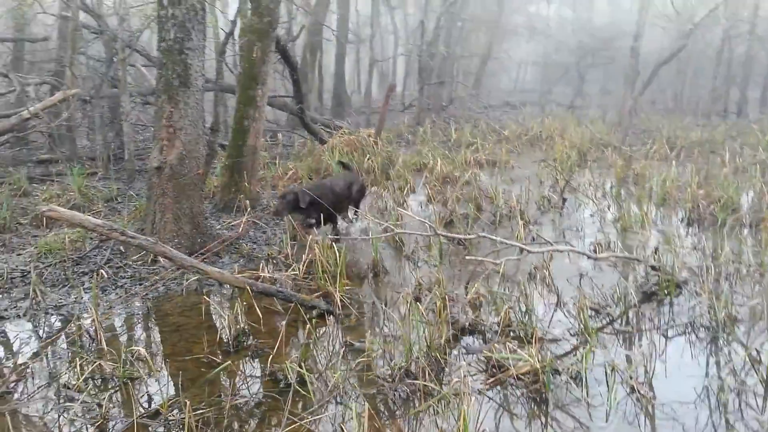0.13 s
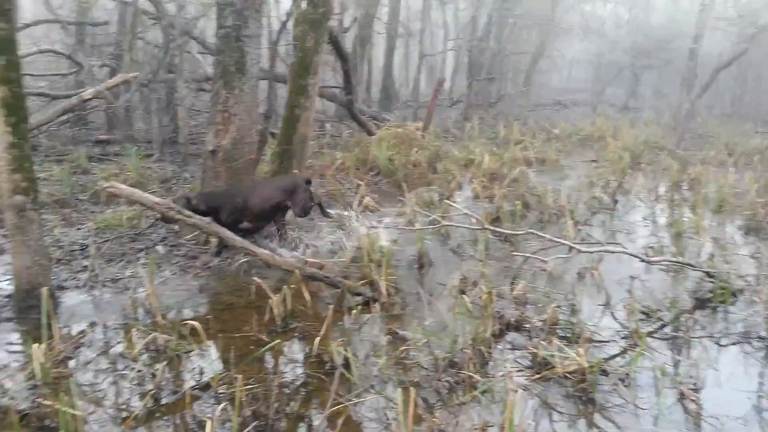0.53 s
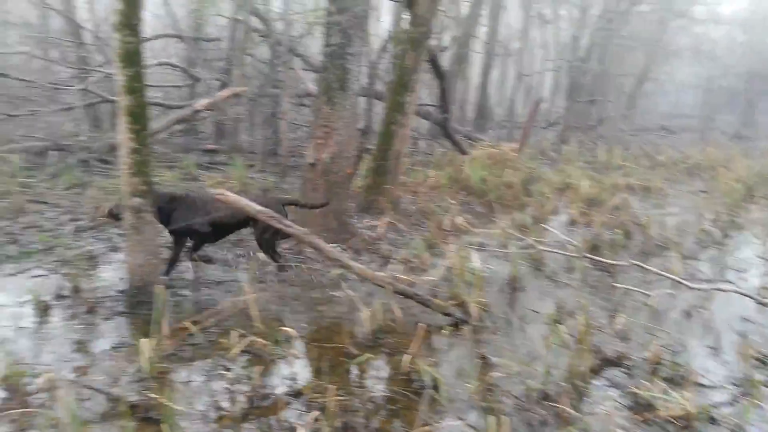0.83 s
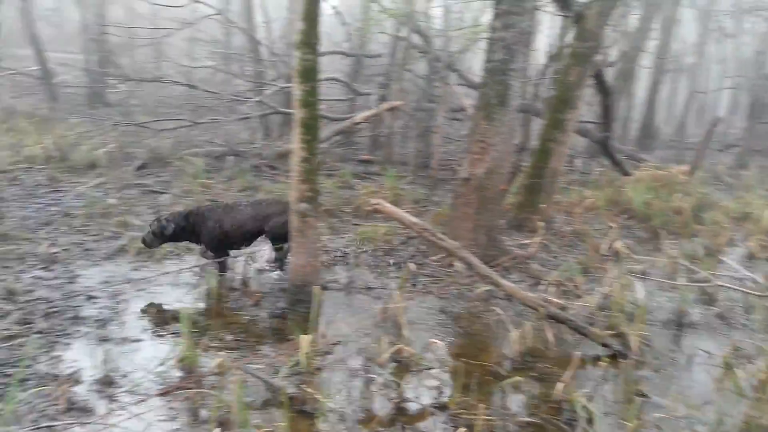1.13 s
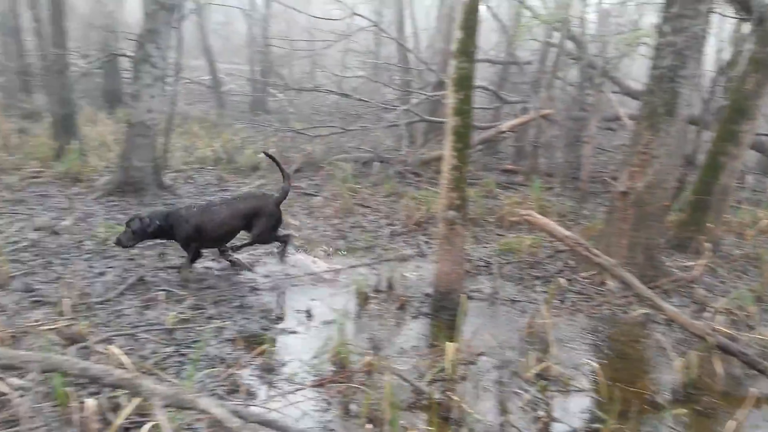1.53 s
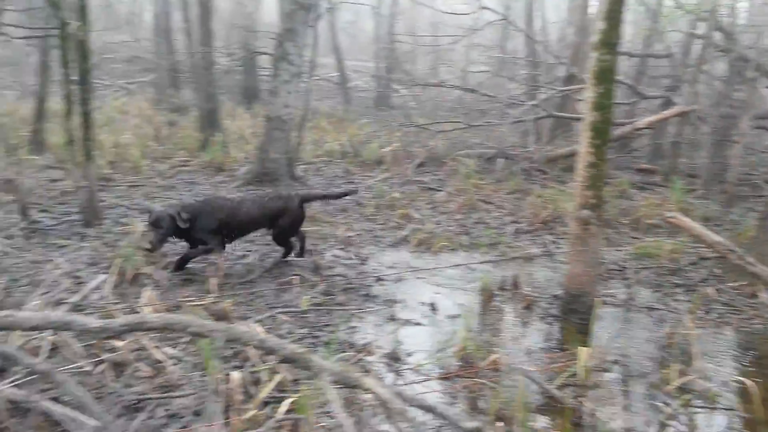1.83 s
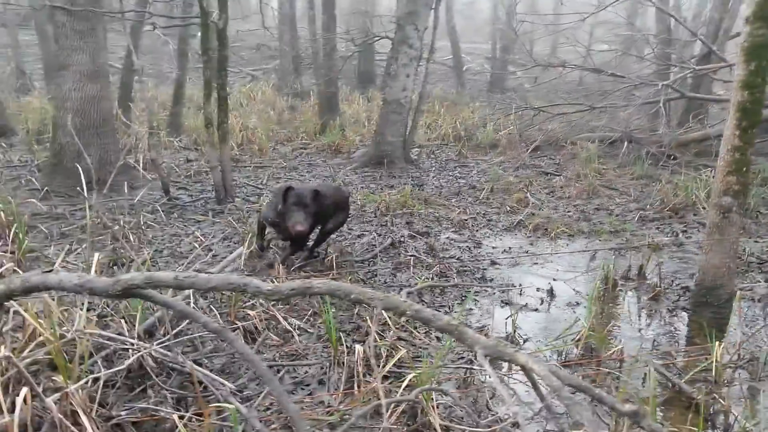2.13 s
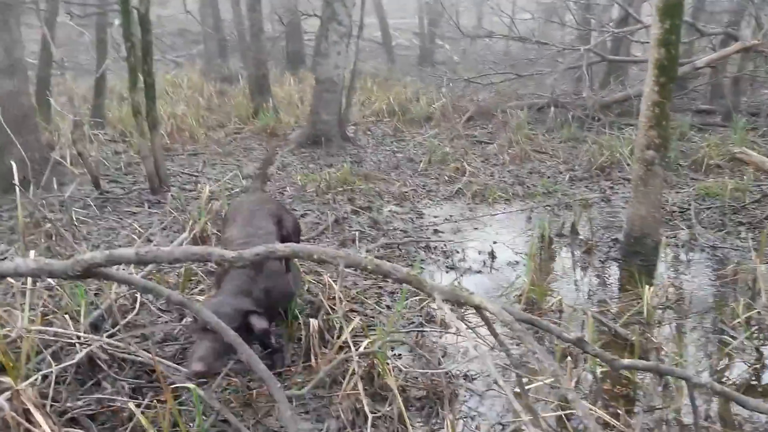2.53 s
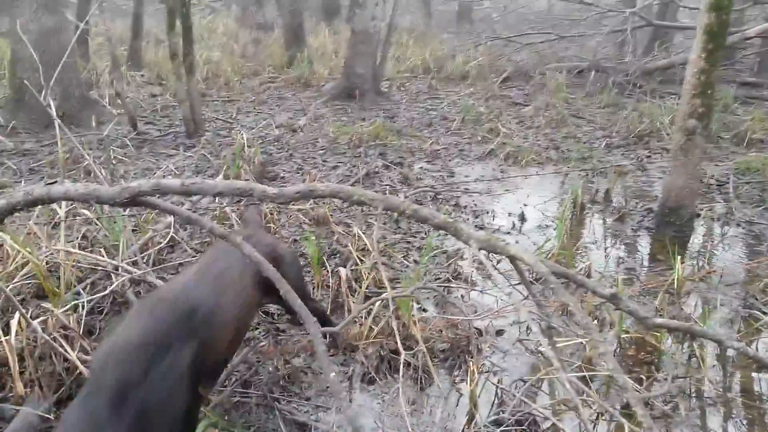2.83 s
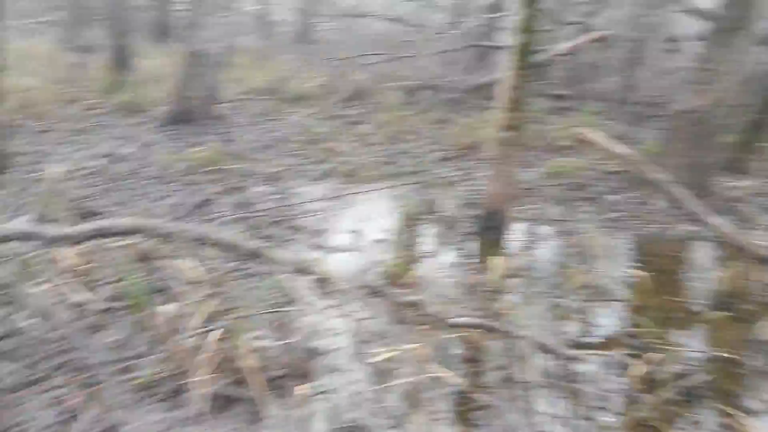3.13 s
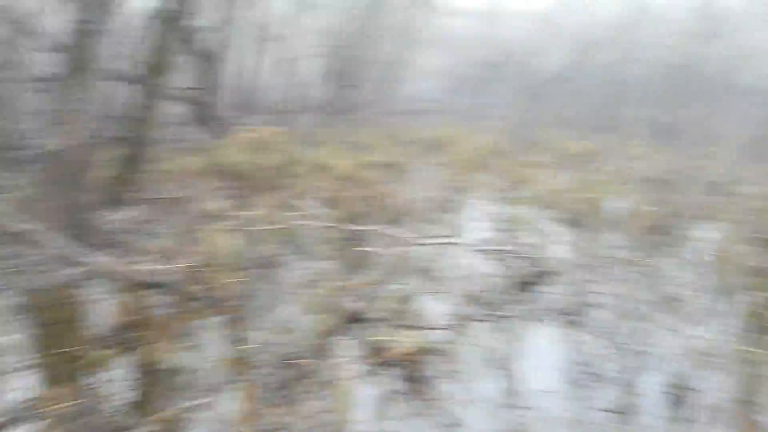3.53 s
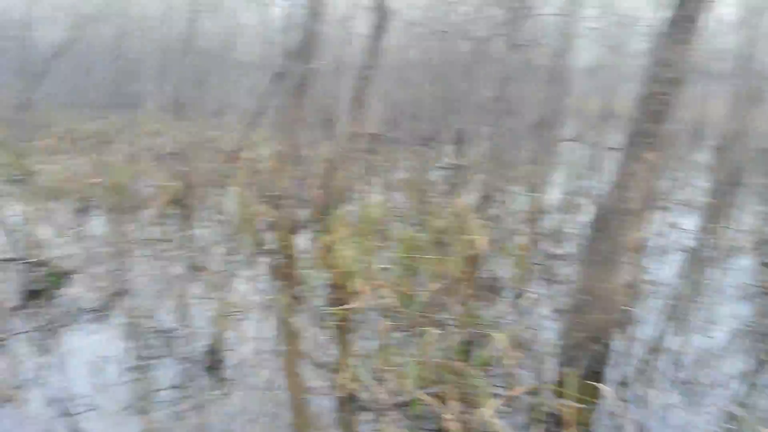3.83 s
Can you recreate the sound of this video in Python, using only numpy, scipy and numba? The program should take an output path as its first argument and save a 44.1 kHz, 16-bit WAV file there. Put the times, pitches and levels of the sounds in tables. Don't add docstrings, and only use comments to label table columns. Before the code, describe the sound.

A dog's paws splash through shallow water and wet stems in woodland, trotting across with crisp slaps, easing briefly, then galloping close past a hand-held phone, with slopping gurgles and duller treble at the end.

```python
import sys
import numpy as np
from scipy import signal
from scipy.fft import rfft, irfft
from scipy.io import wavfile
from scipy.ndimage import uniform_filter1d, map_coordinates
from numba import njit

SR = 44100
rng = np.random.default_rng(int(sys.argv[2]) if len(sys.argv) > 2 else 0)


def file_out(sig):
    cols = np.atleast_2d(sig).T
    lim = np.clip(cols, -1, 1)
    pcm = np.round(lim * 32767).astype(np.int16)
    wavfile.write(sys.argv[1], SR, pcm)


def gain_from_db(level_db):
    decades = np.asarray(level_db, float) / 20
    return 10 ** decades


N = 176400

# start_s, slap_db, spray_under_slap_db, spray_decay_s,
# body_under_slap_db
PAW_SLAPS = [(0.0531, -7, -36, 0.04, -26), (0.134, -31.5, -12, 0.034, -2.5),
             (0.142, -15.5, -11, 0.016, -13), (0.2901, -11.5, -12.5, 0.046, -15.5),
             (0.4005, -9.5, -15, 0.037, -28), (0.5517, -29, -28.5, 0.018, -13), (0.585, -25, -5, 0.12, -42),
             (0.631, -10, -10.5, 0.025, -28.5), (0.855, -25.5, 1, 0.034, -40),
             (0.891, -15, -6.5, 0.035, -51), (1.082, -17, -40, 0.0099, -18.5),
             (1.1159, -8, -19.5, 0.07, -35), (1.253, -23.5, -42, 0.22, -24), (1.3477, -16.5, -6, 0.04, -17),
             (1.399, -17, -18, 0.043, -17.5), (1.555, -19.5, -18, 0.031, -11.5),
             (1.573, -16.5, -11, 0.014, -11.5), (1.585, -13.5, -13, 0.033, -35),
             (1.604, -15, -18, 0.037, -31), (1.64, -14, -31, 0.0065, -14), (1.7125, -24.5, -6, 0.1, -23),
             (1.9628, -22, -33, 0.08, -23),
             (2.29, -34.5, -2, 0.048, -55), (2.375, -25, -17, 0.05, -40),
               (2.388, -25.5, -2, 0.051, -20.5), (2.4542, -25, -13, 0.033, -48),
               (2.477, -17.5, -42, 0.07, -29), (2.528, -22, 4, 0.02, -9.5), (2.587, -27.5, -23, 0.022, -14),
               (2.6626, -25, -0.5, 0.047, -21), (2.741, -36, -23, 0.057, -43),
               (2.7557, -11, -13.5, 0.067, -53), (2.8106, -18, -4, 0.035, -20), (2.836, -14, -3, 0.02, -36),
               (2.893, -2.5, -15, 0.061, -32), (3.0344, -20.5, -6, 0.14, -15),
               (3.074, -10.5, -3, 0.054, -19), (3.132, -11.5, -22, 0.014, -18.5),
               (3.142, -23.5, 6, 0.057, -4), (3.235, -29, 8, 0.043, -36), (3.2786, -10, -5.5, 0.059, -48.5),
               (3.295, -18, 1, 0.09, -11), (3.46, -22.5, 2.5, 0.071, -4.5),
               (3.4864, -13.5, -14.5, 0.078, -12.5), (3.571, -27.5, -16, 0.02, -2.5),
               (3.6695, -28, -15, 0.032, -0.5), (3.735, -38.5, -18, 0.062, 5),
               (3.8135, -30.5, 7, 0.18, -7.5), (3.871, -15.5, -7.5, 0.017, -33)]
# start_s, level_db, pitch_hz
AIR_POCKETS = [(0.054, -19, 532), (0.14, -17.5, 740), (0.291, -14, 940), (0.401, -20, 2400),
               (0.451, -35, 1060), (0.562, -28.5, 834), (0.63, -35, 293), (1.081, -22, 1900),
               (1.1, -21, 2500), (1.151, -20.5, 1510), (1.352, -47, 910), (1.405, -32, 535),
               (1.471, -25.5, 1500), (1.568, -19, 1470), (1.608, -22, 1540), (1.642, -19, 1040),
               (1.734, -27.5, 1070), (2.019, -40, 284), (2.529, -20, 1750), (2.814, -31.5, 320),
               (2.894, -12.5, 527), (2.92, -12, 1910), (3.075, -11.5, 1110), (3.165, -22, 447),
               (3.19, -23, 370), (3.247, -29, 324), (3.306, -9, 653), (3.353, -16.5, 440),
               (3.473, -18.5, 477), (3.849, -19, 436)]
# start_s, level_db, pitch_hz, length_s
HOLE_GLUGS = [
    (0.529, -41, 914, 0.024),
    (3.346, -27, 258, 0.022),
    (3.377, -30, 555, 0.027),
    (3.591, -36.5, 331, 0.04),
    (3.673, -30.5, 320, 0.015),
    (3.801, -31, 306, 0.032),
    (3.828, -34, 400, 0.02),
    (3.919, -35, 341, 0.034),
    (3.939, -35, 303, 0.029),
    (3.945, -34, 574, 0.012),
]
# time_s, patter_db
WADING = [(0, -36.5), (.94, -39), (.98, -46.5), (1.07, -45.5), (1.2, -40.5), (1.8, -43), (1.9, -46),
          (2.03, -44), (2.09, -52.5), (2.2, -40), (2.3, -60), (2.6, -38.5), (2.65, -51), (2.72, -36),
          (3.6, -39.5), (4, -36)]
# time_s, churn_db
HOLE_CHURN = [(0, -52.5), (2.7, -48), (3.15, -45.5), (3.33, -33.5), (3.39, -25.5), (3.43, -35), (3.47, -23),
              (3.56, -37), (3.66, -32.5), (3.68, -35), (3.71, -35.5), (3.79, -33.5), (3.81, -25.5),
              (3.88, -31.5), (3.95, -28), (4, -47)]
# start_s, level_db, top_octave_under_whole_db
STEM_TICKS = [(0.0454, -15, -13), (0.0654, -16, -21), (0.2887, -15, -8), (0.3034, -15, -19),
              (0.3274, -21, -13), (0.4005, -12, -10), (0.4164, -20, -8), (0.5536, -18, -11), (0.6, -17, -7),
              (0.6354, -11, -16), (0.8929, -16, -11), (1.1174, -10, -12), (1.1824, -24, -11),
              (1.2017, -28, -13), (1.2424, -27, -7), (1.2545, -22, -10), (1.3299, -22, -5),
              (1.3503, -17, -8), (1.4012, -15, -12), (1.7345, -24, -10), (1.8138, -22, -23),
              (2.0028, -31, -10), (2.0183, -29, -9), (2.0264, -25, -13), (2.2947, -23, -11),
              (2.3875, -23, -11), (2.3999, -24, -8), (2.4114, -20, -12), (2.4214, -24, -16),
              (2.4304, -30, -10), (2.4553, -25, -11), (2.4678, -20, -10), (2.4788, -15, -15),
              (2.587, -25, -16), (2.6653, -24, -11), (2.6793, -23, -11), (2.7104, -19, -15),
              (2.7364, -24, -13), (2.7427, -15, -10), (2.7541, -12, -12), (2.7704, -19, -8),
              (2.8095, -15, -11), (2.8933, -8, -12), (3.0804, -12, -10), (3.0964, -9, -12),
              (3.1094, -11, -11), (3.1318, -11, -10), (3.2789, -11, -16), (3.2974, -15, -11),
              (3.473, -19, -15), (3.4875, -15, -17), (3.5504, -23, -17), (3.8526, -24, -18),
              (3.8726, -19, -22), (3.9764, -23, -11)]
# time_s, left_port_lag_samples
DOG_BEARING = [
    (0, 1.7),
    (1.3, 5),
    (2.4, 1.55),
    (3.1, 8.8),
]
# frequency_hz, density_db_per_hz
SPRAY_SPECTRUM = [(1200, -8.5), (2200, -2), (5500, -3), (11000, -4.5), (16000, -5.5)]
# frequency_hz, density_db_per_hz
BODY_SPECTRUM = [(250, -30), (500, -3.5), (1000, -0.5), (2000, -3.5), (5000, -19)]
# frequency_hz, density_db_per_hz
RUMBLE_SPECTRUM = [(25, -32), (65, 4), (160, -1), (300, -8.5), (700, -32), (2000, -22.5)]
# frequency_hz, density_db_per_hz
DRIZZLE_SPECTRUM = [(2500, -20), (6000, -1), (13000, -6)]
# frequency_hz, width_hz, level_db
LEFT_RESONANCES = [(5110, 890, 13), (18700, 1240, 19.5)]
# frequency_hz, width_hz, level_db
RIGHT_RESONANCES = [(12190, 1360, 13), (420, 2400, -7)]


def colour(points):
    f = np.arange(N // 2 + 1) * SR / N + 1
    hz, db = np.array(points, float).T
    a, b = rfft(rng.standard_normal((2, N)))
    alike = 0.87 / (1 + (f / 2400) ** 2)
    pair = np.array([a, alike * a + np.sqrt(1 - alike ** 2) * b])
    x = irfft(gain_from_db(np.interp(np.log(f), np.log(hz), db)) * pair, N)
    return x / x.std()


def walk(rate_hz):
    k = int(SR / rate_hz)
    w = uniform_filter1d(uniform_filter1d(rng.standard_normal(N), k), k)
    return w / w.std()


def follow(points):
    return np.interp(np.arange(N) / SR, *np.array(points).T)


def late(x):
    left = map_coordinates(x[0], [np.arange(N) - follow(DOG_BEARING)], mode="mirror")
    return np.array([left, x[1]])


def patchy(x, depth_db, rate_hz):
    spec, f = rfft(x), np.arange(N // 2 + 1) * SR / N
    edges = [0, 1800, 2800, 4200, 6500, 9500, SR]
    out = np.zeros((2, N))
    for lo, hi in zip(edges, edges[1:]):
        out += irfft(spec * ((f >= lo) & (f < hi)), N) * gain_from_db(depth_db * walk(rate_hz))
    return out


@njit
def ring(n, at, w, cycles, size, lag, glide, onset):
    out = np.zeros((2, n))
    for g in range(len(at)):
        fade = 6.9 * w[g] / (2 * np.pi * cycles[g])
        for c in range(2):
            start = at[g] + (lag[g] if c == 0 else 0.)
            i0 = int(start) + 1
            for i in range(max(i0, 0), min(n, i0 + int(5 / fade))):
                u = i - start
                level = size[g] * np.exp(-fade * u) * (1 - np.exp(-onset * w[g] * u))
                out[c, i] += level * np.sin(w[g] * u * (1 + glide * fade * u))
    return out


def grains(s, hz, cycles, size, glide):
    scatter = 3 * rng.standard_normal(len(s))
    lag = np.interp(s, *np.array(DOG_BEARING).T) + scatter
    return ring(N, s * SR, 2 * np.pi * hz / SR, cycles * np.ones(len(s)), size, lag, 1. * glide, 0.28)


def shower(env, count, lo_hz, hi_hz, cycles, glide):
    when, pitch, rarity, sign = rng.random((count, 4)).T
    hz = lo_hz * (hi_hz / lo_hz) ** pitch
    size_db = 2.0 * np.minimum(-np.log(1 - rarity), 4.0)
    size = gain_from_db(size_db) * np.sign(sign - .5) / np.sqrt(np.mean(gain_from_db(2 * size_db)))
    gain = np.sqrt(4 * 4.74 * N / count / cycles * hz / SR)
    return grains(when * N / SR, hz, cycles, size * gain * env[(when * N).astype(int)], glide)


def rumble():
    hum_hz = 151.4 + 4 * walk(8)
    hum = gain_from_db(-56.5 + 3 * walk(7)) * np.sin(2 * np.pi * np.cumsum(hum_hz) / SR)
    return colour(RUMBLE_SPECTRUM) * gain_from_db(-49.5 + 1.5 * walk(6)) + hum


def drizzle():
    return colour(DRIZZLE_SPECTRUM) * gain_from_db(-58 + 2.7 * walk(30))


def paw_efforts():
    rise_s, slap_s = 0.0018, 0.0032
    t, power = np.arange(N) / SR, np.zeros((3, N))
    for s, db, spray_db, decay_s, body_db in PAW_SLAPS:
        i = int(s * SR)
        u = t[i:i + SR // 2] - s + 1 / SR
        rise = 1 - np.exp(-u / rise_s)
        tail = (1 - np.exp(-u / (0.19 * decay_s))) * np.exp(-(u / decay_s) ** 1.35)
        slap = rise * np.exp(-u / slap_s)
        spray = gain_from_db(spray_db) * rise * tail
        body = gain_from_db(body_db + 9) * (slap + 0.64 * tail)
        power[:, i:i + len(u)] += gain_from_db(2 * db) * np.array([slap, spray, body]) ** 2
    return np.sqrt(power)


def crackle(env, count):
    when, rarity = rng.random((count, 2)).T
    hit = np.zeros(N)
    hit[(when * N).astype(int)] = gain_from_db(np.minimum(-4.5 * np.log(1 - rarity), 9))
    click_s = 0.00031
    return env * signal.lfilter([1], [1, -np.exp(-1 / (click_s * SR))], hit)


def spray_sheet(slap, wet):
    torn = wet * gain_from_db(3.42 * walk(93)) + 0.69 * crackle(wet, count=260)
    noise = patchy(colour(SPRAY_SPECTRUM), depth_db=2.5, rate_hz=37.4)
    return late(noise * gain_from_db(-11) * np.hypot(gain_from_db(3.5) * slap, torn))


def splash_body(body):
    return late(colour(BODY_SPECTRUM) * body * gain_from_db(-8.0 + 1.55 * walk(190)))


def splashes():
    slap, spray, body = paw_efforts()
    patter, churn = gain_from_db(follow(WADING)), gain_from_db(follow(HOLE_CHURN))
    wet = np.hypot(spray, patter * gain_from_db(3.5 + 0.97 * walk(10.5)))
    stirred = np.hypot(body, 1.52 * patter)
    drops = shower(wet, count=6000, lo_hz=1520, hi_hz=13900, cycles=4.8, glide=0.018)
    bubbles = shower(stirred, count=1500, lo_hz=685, hi_hz=3120, cycles=24, glide=0.059)
    gurgle = shower(churn, count=2000, lo_hz=245.7, hi_hz=775, cycles=5.5, glide=0.0092)
    water = spray_sheet(slap, wet) + splash_body(body)
    return water + gain_from_db(-7.5) * drops + gain_from_db(-13) * bubbles + gain_from_db(-3) * gurgle


def ticks():
    s, db, top_db = np.repeat(np.array(STEM_TICKS), 6, axis=0).T
    delay, place = rng.random((len(s), 2)).T
    part = (np.arange(len(s)) % 6 + place) / 6
    tilt_db = np.clip(2 * (top_db + 13), -12, 12) * (part - .5)
    return grains(s + .0007 * delay, 3000 * 4.8 ** part, 7.0, gain_from_db(db - 1.5 + tilt_db), glide=0)


def plops():
    s, db, hz = np.array(AIR_POCKETS).T
    return grains(s + 0.001516, hz, 10.9, gain_from_db(db + 2.0), glide=0.0056) * gain_from_db(1.2 * walk(300))


def glugs():
    out = np.zeros(N)
    for s, db, hz, length_s in HOLE_GLUGS:
        u = np.arange(int(length_s * SR)) / (length_s * SR)
        tone = np.sin(2 * np.pi * hz * length_s * u * (1 + 0.12 * u))
        swell = np.sin(np.pi * u ** 0.69)
        i = int(s * SR)
        out[i:i + len(u)] += gain_from_db(db) * swell * tone
    return late(np.tile(out * gain_from_db(0.83 * walk(120)), (2, 1)))


def among_trees(near):
    t60_s, level_db = 0.1, -13
    u = np.arange(SR // 2) / SR
    tail = rng.standard_normal((2, len(u))) * np.exp(-np.log(1000) * u / t60_s) * (u > .004)
    tail = tail / np.sqrt(np.sum(tail[0] ** 2))
    return near + gain_from_db(level_db) * signal.fftconvolve(near, tail, axes=1)[:, :N]


def turn_away(x):
    turn_s, shade_db, turn_per_s = 3.18, -12.5, 2
    low = signal.filtfilt(*signal.butter(2, 8000, fs=SR), x)
    turned = np.clip((np.arange(N) / SR - turn_s) * turn_per_s, 0, 1)
    return low + (x - low) * gain_from_db(shade_db * turned)


def scene():
    near = drizzle() + splashes() + ticks() + plops() + glugs()
    return turn_away(among_trees(near)) + rumble()


def port(x, peaks):
    out = x.copy()
    for hz, width_hz, db in peaks:
        out += gain_from_db(db) * signal.lfilter(*signal.iirpeak(hz, hz / width_hz, fs=SR), x)
    return out


def low_pass(x):
    return signal.sosfilt(signal.butter(12, 16790, fs=SR, output="sos"), x)


def record(dry):
    x = np.array([port(dry[0], LEFT_RESONANCES), port(dry[1], RIGHT_RESONANCES)])
    x = signal.sosfilt(signal.ellip(8, .2, 58, 15600, fs=SR, output="sos"), x)
    return low_pass(x)


dry = scene()
out = record(dry)
file_out(out)
```